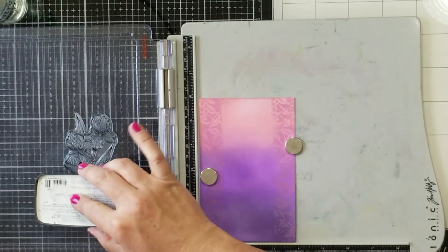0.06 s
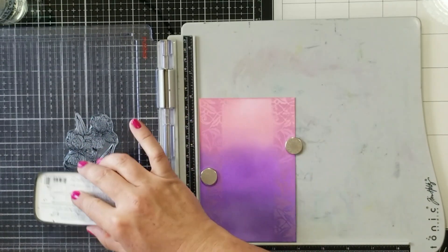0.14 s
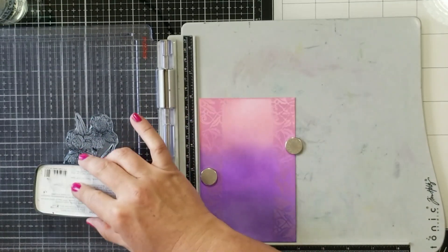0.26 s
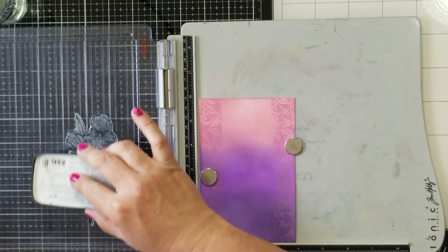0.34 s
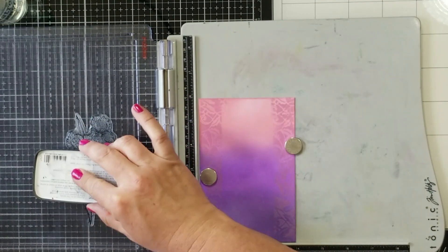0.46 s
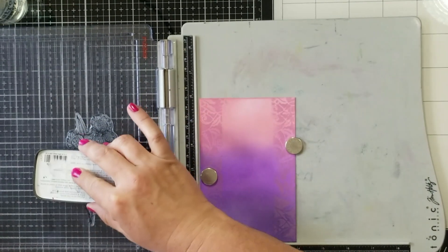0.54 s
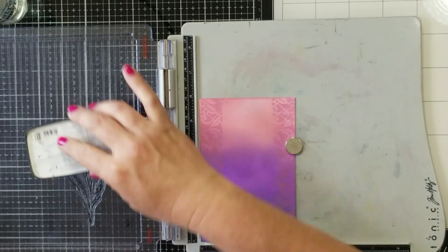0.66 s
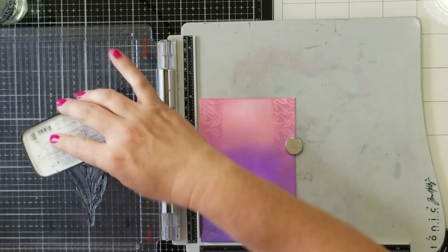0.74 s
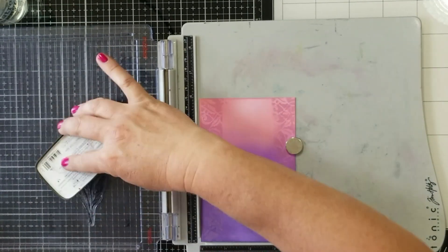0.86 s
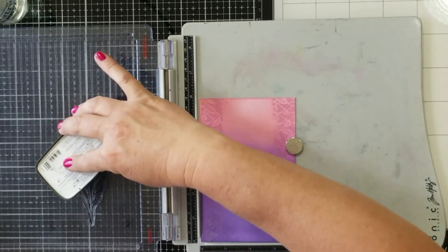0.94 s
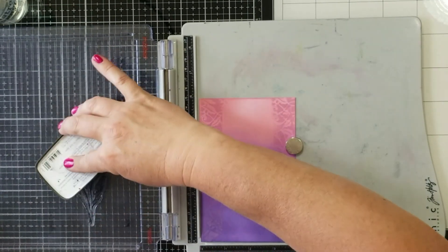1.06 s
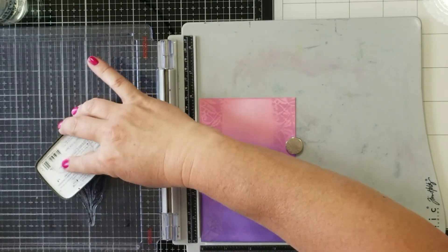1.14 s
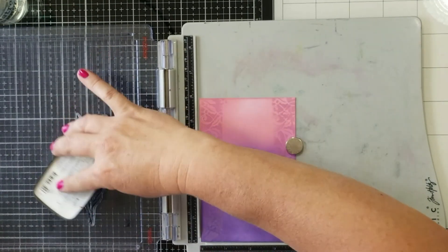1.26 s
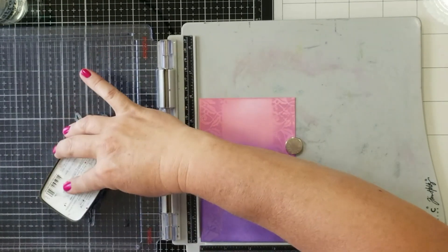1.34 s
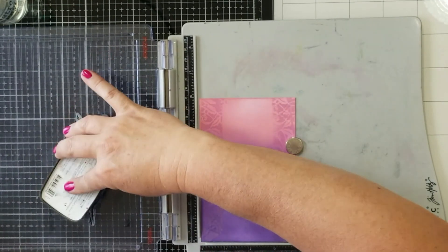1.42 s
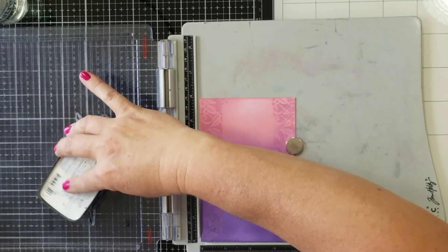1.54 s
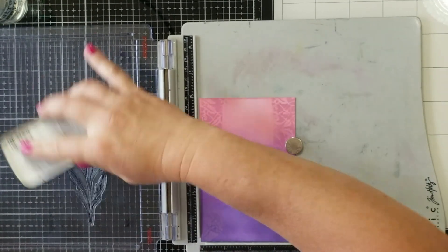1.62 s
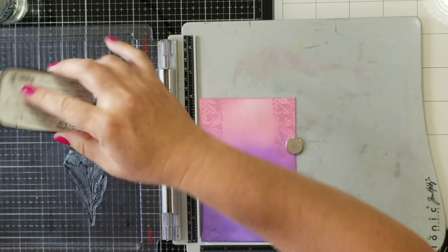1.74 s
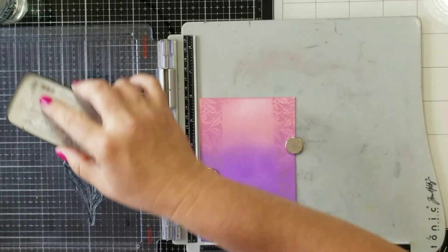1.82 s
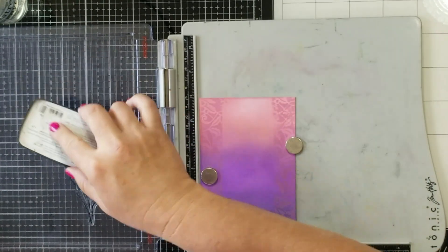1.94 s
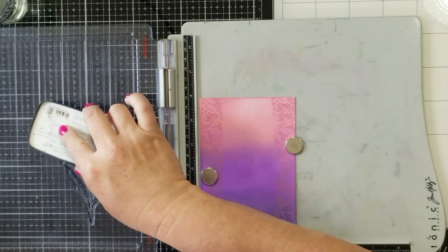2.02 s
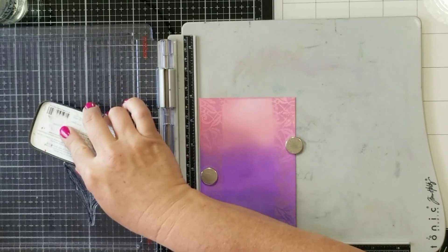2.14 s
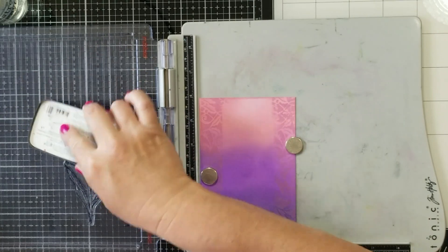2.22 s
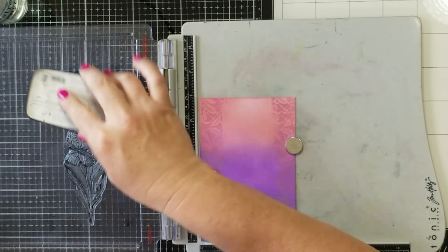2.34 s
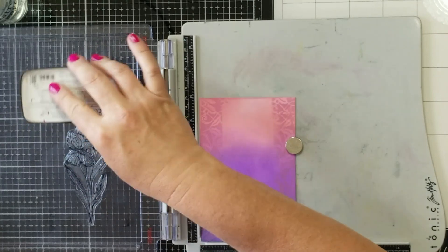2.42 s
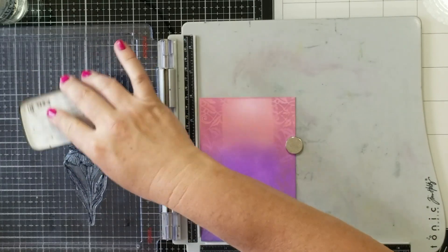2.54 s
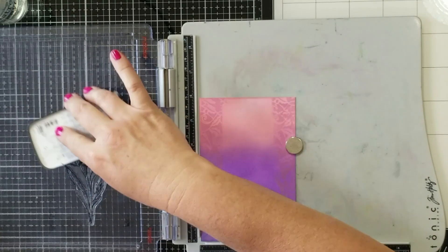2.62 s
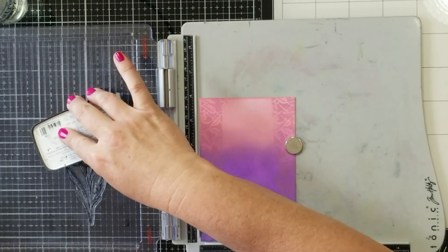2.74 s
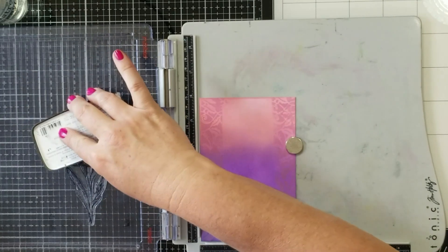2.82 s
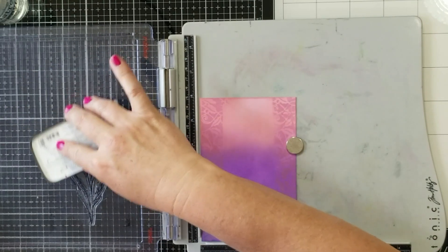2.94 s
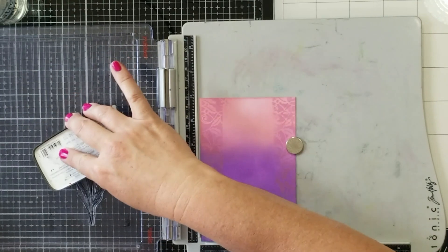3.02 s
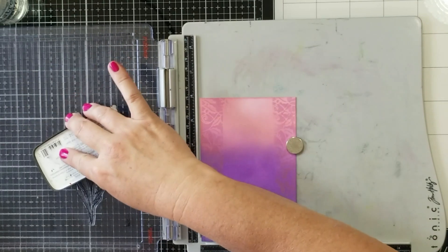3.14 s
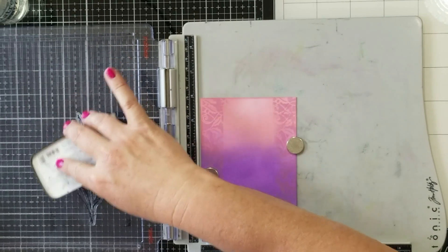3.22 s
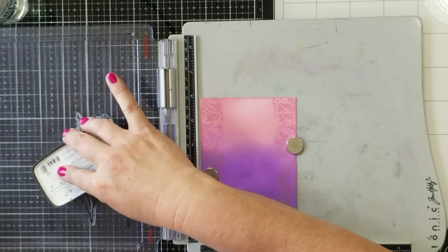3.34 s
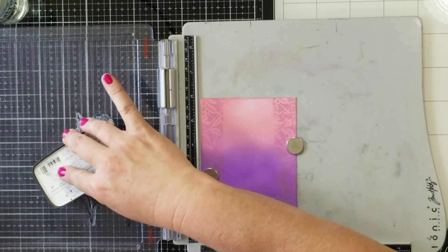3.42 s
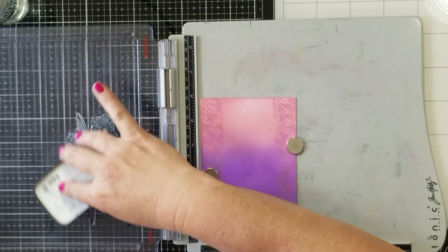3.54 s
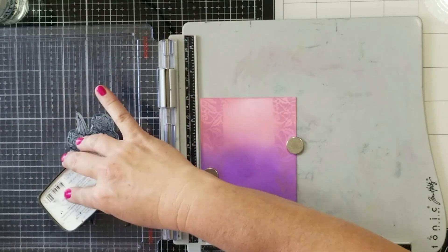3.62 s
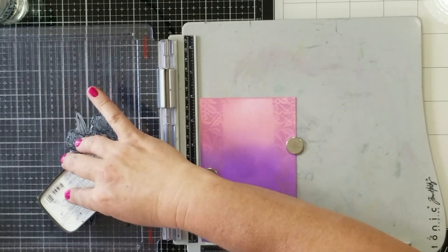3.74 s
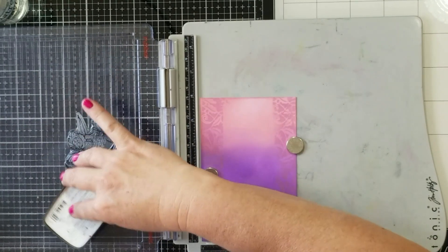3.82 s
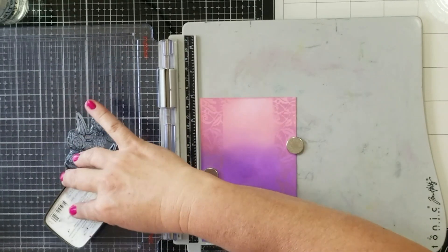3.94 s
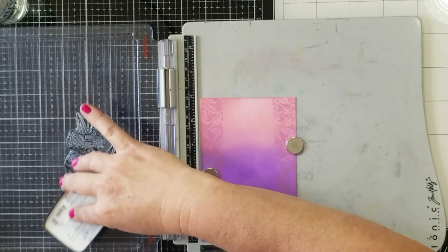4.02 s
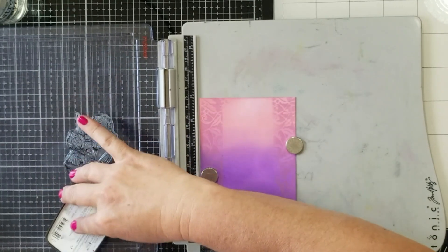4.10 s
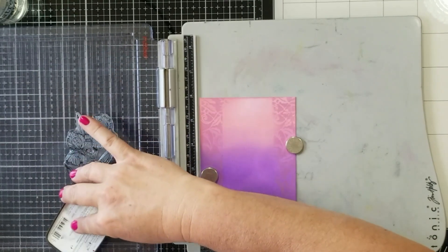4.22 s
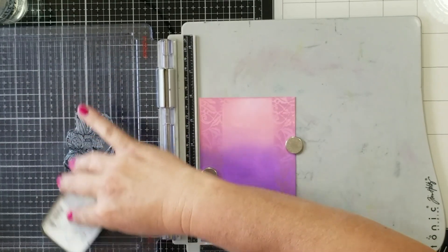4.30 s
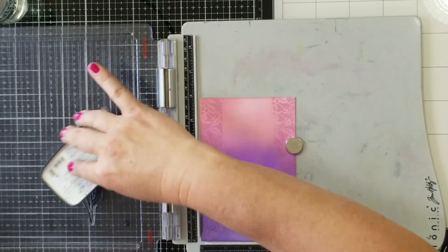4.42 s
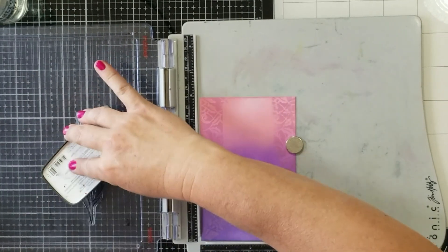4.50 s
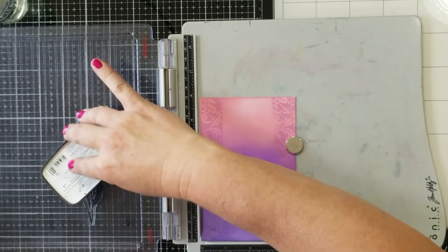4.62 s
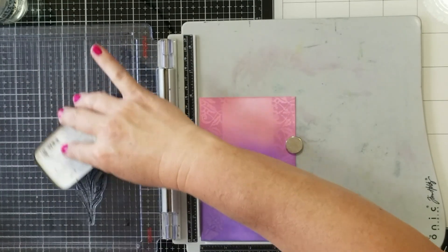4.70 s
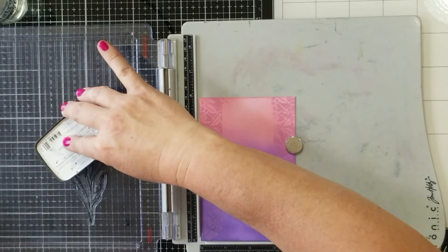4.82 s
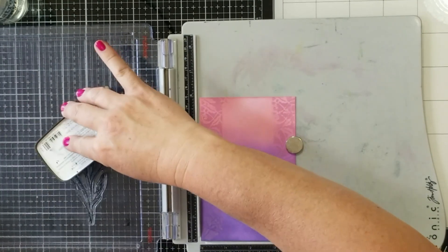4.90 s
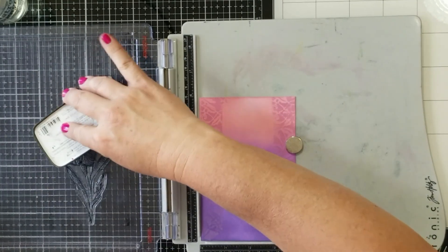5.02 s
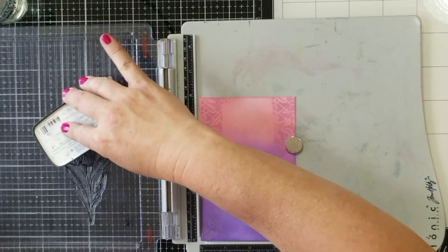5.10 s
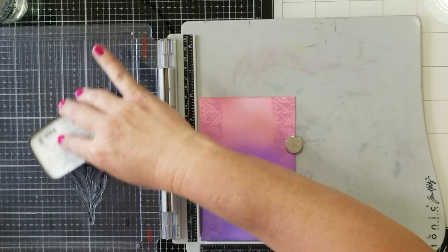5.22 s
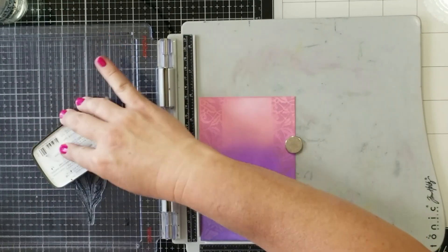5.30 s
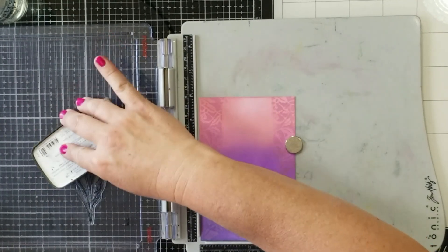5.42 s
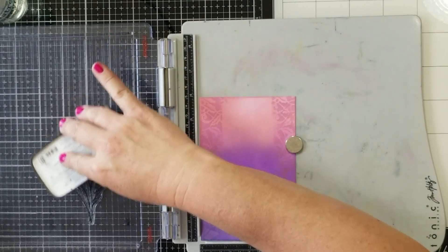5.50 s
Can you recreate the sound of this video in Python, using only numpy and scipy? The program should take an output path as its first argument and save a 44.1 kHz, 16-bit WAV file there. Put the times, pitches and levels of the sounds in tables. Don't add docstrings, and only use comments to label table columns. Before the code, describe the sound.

Irregular dabs of a pad on a plastic board: a firm one near the start, sparser and softer ones around one to two seconds, then closer, stronger ones after two and a half, loudest near five. Low table rumble swells under the pressing hand, and tiny crisp snaps mark the pad lifting. Small quiet room with short decay, close stereo pickup, soft air hum and hiss.

```python
import sys
import numpy as np
from scipy import signal
from scipy.fft import rfft, irfft
from scipy.io import wavfile

SR = 44100
rng = np.random.default_rng(int(sys.argv[2]) if len(sys.argv) > 2 else 0)


def volts_from_db(level):
    exponent = np.asarray(level, float) / 20
    return 10 ** exponent


def output_pcm(signal):
    pcm = np.clip(np.atleast_2d(signal).T, -1, 1) * 32767
    wavfile.write(sys.argv[1], SR, np.round(pcm).astype(np.int16))


N = 245195


def at_hz(points, hz, column=1):
    return np.interp(np.log(hz), np.log(np.array(points)[:, 0]), np.array(points)[:, column])


def rms_one(x):
    return x / np.sqrt(np.mean(x ** 2) + 1e-20)


def bandpass(x, order, low_hz, high_hz):
    return signal.sosfilt(signal.butter(order, [low_hz, high_hz], "band", fs=SR, output="sos"), x)


def ring(force, hz, t60):
    radius = volts_from_db(-60 / (max(t60, .01) * SR))
    angle = 2 * np.pi * hz / SR
    return signal.lfilter([0, np.sin(angle)], [1, -2 * radius * np.cos(angle), radius * radius], force + 1e-18)


def pair(mid, side, alike):
    alike = np.clip(alike, 0, 1)
    opposed = np.sqrt(1 - alike) * side * np.array([[1], [-1]])
    return (np.sqrt(1 + alike) * mid + opposed) / np.sqrt(2)


def lay(times, shapes):
    size = shapes.shape[-1]
    out = np.zeros(shapes.shape[1:-1] + (N + size,))
    for s, shape in zip(times, shapes):
        start = round(s * SR)
        out[..., start:start + size] += shape
    return out[..., :N]


def flicker(rate_hz, count):
    knots = rng.standard_normal((count, 2000))
    return np.array([np.interp(np.arange(N) / SR * rate_hz, np.arange(2000), k) for k in knots])


def humps(events, rest_db, on_db_per_s, off_db_per_s):
    s, level_db = np.transpose(events)[:, :, None]
    t = np.arange(0, N + 64, 64) / SR - s
    slope_db = np.minimum(on_db_per_s * t, -off_db_per_s * t)
    power = volts_from_db(2 * (level_db + slope_db)).sum(axis=0) + volts_from_db(2 * rest_db)
    return np.interp(np.arange(N) / 64, np.arange(len(power)), np.sqrt(power))


def coloured(spectrum, likeness):
    hz = np.maximum(np.arange(N // 2 + 1) * SR / N, 1)
    mid, side = rfft(rng.standard_normal((2, N))) * volts_from_db(at_hz(spectrum, hz))
    return rms_one(irfft(pair(mid, side, at_hz(likeness, hz)), N))


# frequency_hz, density_db (per Hz)
HISS = [(6000, -29.5), (7800, -13.5), (8300, -18), (9800, -18), (10300, -14), (12500, -5), (14500, -5),
        (15500, 2), (15750, -6), (15900, -48)]
HISS_DB = -77


def hiss():
    return volts_from_db(HISS_DB + 3.0) * coloured([(17, -44)] + HISS, [(20, .02), (16000, 0.028)])


# frequency_hz, density_db (per Hz)
AIR = [(15, -15), (25, -6.5), (128, 0.5), (192, -9.5), (341, -11), (403, -19.5), (434, -14), (1080, -18.5),
       (1370, -12), (1830, -20.5), (7700, -28), (10000, -46), (16900, -120)]
# frequency_hz, left_right_likeness (0 to 1)
AIR_LIKENESS = [(60, 0.67), (240, 0.39), (950, 0.0075), (3770, 0.065), (15000, 0.019)]
# frequency_hz, width_hz, level_db (over the air)
FAN_RESONANCES = [(771, 91, -1), (1540, 350, -4.5)]
AIR_DB = -69.5


def air():
    out = coloured(AIR, AIR_LIKENESS)
    for hz, width_hz, hump_db in FAN_RESONANCES:
        hump = rms_one(ring(rng.standard_normal(N), hz, 2.2 / width_hz))
        out = out + volts_from_db(hump_db - 10.5) * hump * volts_from_db(np.array([[0], [-9.0]]))
    return volts_from_db(AIR_DB) * out


# frequency_hz, level_db, t60_s, sign, rocks (1 if it rocks)
TABLE = [(45, -14, .17, 1, 0), (58.7, 0, .345, -1, 0), (65.7, -12, .5, 1, 0), (74.6, -7.6, .49, 1, 0),
         (93, -7, .45, 1, 1)]
# peak_s, level_db
LEANS = [
    (0.0, -56),
    (.31, -45),
    (2.15, -49.5),
    (2.93, -62),
    (3.76, -63.5),
    (4.47, -64),
    (4.99, -59),
    (5.4, -50),
]


def rumble():
    stir = rng.standard_normal(N)
    hum = sum(volts_from_db(mode_db) * ring(stir, hz, t60) for hz, mode_db, t60, _, _ in TABLE)
    return rms_one(hum) * volts_from_db(-6.0) * humps(LEANS, rest_db=-77.5, on_db_per_s=88, off_db_per_s=91)


# peak_s, level_db
PEELS = [(.12, -71), (.96, -79), (1.172, -72), (1.58, -77), (2.07, -75), (2.26, -68.5), (2.88, -73),
         (3.22, -71), (3.54, -66.5), (4.06, -81), (4.32, -71), (4.99, -71), (5.34, -72), (5.5, -72)]


def peel():
    snaps = rng.standard_normal((2, N)) * volts_from_db(4.2 * flicker(150., count=1))
    bright = bandpass(snaps, 3, 10300., 15300.)
    smear = bandpass(snaps, 2, 3500., 10000.)
    film = rms_one(bright) + volts_from_db(-6.5) * rms_one(smear)
    return film * volts_from_db(-5.0) * humps(PEELS, rest_db=-82, on_db_per_s=200, off_db_per_s=85)


# start_s, peak_db
TICKS = [(1.0505, -70), (1.1633, -64), (1.5773, -66), (2.2508, -64), (2.89, -68), (3.1976, -67),
         (3.486, -68), (3.5294, -54), (3.5325, -61), (3.537, -62), (4.2966, -67), (4.6748, -65),
         (4.9556, -66)]


def ticks():
    s, peak_db = np.transpose(TICKS)
    t = np.arange(2600) / SR
    shape = np.exp(-t / .0008) + .12 * np.exp(-t / .012)
    bursts = shape * rng.standard_normal((len(s), 2, 2600))
    snaps = lay(s, bursts * volts_from_db(peak_db + 4)[:, None, None])
    body = bandpass(snaps, 2, 4000, 7500)
    top = bandpass(snaps, 2, 10300, 14500)
    return .7 * body + 1.5 * top


def swell(spread_ms, edge, size=2600):
    u = np.arange(size) / SR * 1000 / np.clip(spread_ms, .2, 20)[:, None]
    shape = (u + max(edge, 0) * np.exp(-2 * u)) * np.exp(-u)
    return shape / np.sqrt(np.sum(shape ** 2, axis=1, keepdims=True))


# frequency_hz, left_right_likeness (0 to 1)
DAB_LIKENESS = [(60, .99), (130, 0.99), (290, 0.84), (850, 0.71), (1500, 0.11), (3000, 0.026)]
SPAN = 2 ** 14


def struck(times, level_db, spread_ms, modes, edge, scatter_db, tilt_db=0):
    rough = rng.standard_normal((len(times), 2, 2600))
    force = rfft(swell(spread_ms, edge)[:, None] * rough, SPAN)
    alike = at_hz(DAB_LIKENESS, np.maximum(np.arange(SPAN // 2 + 1) * SR / SPAN, 1))
    force = np.array([pair(mid, side, alike) for mid, side in force])
    hz, mode_db, t60 = np.transpose(modes)
    t = np.arange(SPAN) / SR
    decay = volts_from_db(-60 * t / np.clip(t60, .04, .26)[:, None])
    rings = rfft(np.sin(2 * np.pi * hz[:, None] * t) * decay)
    at_modes = force[..., np.round(hz * SPAN / SR).astype(int)]
    drive = np.sqrt(np.mean(np.abs(at_modes) ** 2, axis=1))
    mode_db = mode_db + np.outer(tilt_db, np.log2(hz / np.median(hz)))
    scatter = scatter_db * rng.standard_normal(drive.shape)
    gain = volts_from_db(level_db[:, None] + mode_db + scatter) / (drive + 0.67)
    return lay(times, irfft(force * (gain @ rings)[:, None], SPAN))


# start_s, table_db, rocking_share_db, board_thud_db, board_knock_db
PRESSES = [(0.079, -36, 4.5, -45, -59), (0.23, -37.5, 4, -45.5, -44.5), (0.904, -42, -9, -46, -43),
           (1.332, -46, 3.5, -47, -66), (2.084, -40, -26, -45.5, -52.5), (2.699, -39.5, -3, -43, -44.5),
           (3.012, -48.5, -2, -51, -60), (3.314, -40, 2.5, -49, -49), (3.601, -37, 6.5, -40.5, -48),
           (3.871, -40.5, 5, -51.5, -56), (4.132, -45.5, 0, -66.5, -68), (4.486, -35, -0.5, -42.5, -48.5),
           (4.784, -30, -18, -37.5, -39), (5.055, -33, 2, -42, -50), (5.315, -32, -0.5, -43, -38.5),
           (5.545, -71, -2, -56, -60.5)]
# start_s, table_db, board_thud_db
NUDGES = [
    (0.008, -70, -70),
    (0.398, -49.5, -60),
    (0.438, -49.5, -61),
    (2.199, -55.5, -69),
    (4.287, -59.5, -84),
    (4.627, -57.5, -78),
    (4.683, -55, -80),
    (4.985, -60, -81),
]
NUDGE_ROCK_DB, NUDGE_KNOCK_DB = 1.5, -8


def presses():
    nudges = [(s, db, NUDGE_ROCK_DB, thud_db, thud_db + NUDGE_KNOCK_DB) for s, db, thud_db in NUDGES]
    return np.transpose(sorted([tuple(row) for row in PRESSES] + nudges))


def table():
    s, table_db, rock_db, _, _ = presses()
    u = np.arange(1500) / SR / .002
    push = (u * np.exp(-u) / np.sum(u * np.exp(-u)))[None]
    out = 0
    for hz, mode_db, t60, sign, rocks in TABLE:
        level_db = table_db + mode_db + rocks * rock_db + 5.0
        out = out + sign * ring(lay(s, push * volts_from_db(level_db)[:, None]), hz, t60)
    return out


# frequency_hz, level_db, t60_s
BOARD_THUD = [(132, -9, 0.49), (152, -20, 0.3), (165.8, -5, 0.3), (177.4, -3, 0.22), (189.8, 1.5, 0.213),
              (203, -21.5, 0.27)]
# frequency_hz, level_db, t60_s
BOARD_KNOCK = [(245.5, -11, 0.4), (275.7, -1, 0.25), (308.1, -3.5, 0.48), (348.9, 3, 0.17),
               (374, -23, 0.34)]


def board():
    s, _, _, thud_db, knock_db = presses()
    spread_ms = np.full(len(s), 12.6)
    thud = struck(s + 0.00595, thud_db + 5.5, spread_ms, BOARD_THUD, edge=0.024, scatter_db=1.5)
    knock = struck(s + 0.00188, knock_db + 1.0, 1.27 * spread_ms, BOARD_KNOCK, edge=0.025, scatter_db=0.5)
    return thud + knock


# start_s, lid_ring_db, lid_knock_db, case_ring_db, clack_db
DABS = [(.072, -55, -64, -59, -78), (0.2243, -40.5, -44.5, -47, -64.5), (.245, -53, -50.5, -70, -74),
        (0.8974, -45, -43.5, -48.5, -56), (1.328, -58, -62.5, -76, -80), (2.084, -40, -50.5, -55.5, -63.5),
        (2.699, -36, -48, -61.5, -72.5), (3.012, -71, -63.5, -78, -81), (3.311, -49, -58.5, -68, -74.5),
        (3.601, -38.5, -58, -53, -63.5), (3.617, -43, -50, -58, -77), (3.870, -44, -62, -64, -75),
        (4.128, -57.5, -78, -70, -91), (4.491, -44.5, -59, -63, -66.5), (4.672, -68, -80, -77, -74),
        (4.785, -36.5, -40.5, -45, -63), (5.058, -35.5, -44.5, -51.5, -76), (5.316, -49, -43.5, -63, -96),
        (5.545, -60, -57, -71, -78)]
# start_s, knock_db
GRAZES = [
    (2.077, -55),
    (2.687, -51),
    (3.596, -57),
    (4.473, -52),
    (4.776, -44),
    (5.049, -50.5),
    (5.308, -47),
]
GRAZE_LID_DB, GRAZE_CASE_DB, GRAZE_CLACK_DB = -2.5, -14, -23
SQUARE_MS, ROLLED_MS, GRAZE_MS = 3.1, 4.45, 4.8


def touches():
    rolled = [any(0 < dab[0] - s < .02 for s, _ in GRAZES) for dab in DABS]
    rows = [(*dab, ROLLED_MS if roll else SQUARE_MS) for dab, roll in zip(DABS, rolled)]
    for s, db in GRAZES:
        rows.append((s, db + GRAZE_LID_DB, db, db + GRAZE_CASE_DB, db + GRAZE_CLACK_DB, GRAZE_MS))
    return np.transpose(sorted(rows))


# frequency_hz, level_db, t60_s
ECHO = [(1215, -6.5, 0.29), (1685, -7.5, 0.25), (2890, -4.5, 0.28), (4090, -3, 0.26), (4780, -1.5, 0.24),
        (7030, -2.5, 0.25)]


def clack():
    s, _, _, case_db, clack_db, spread_ms = touches()
    white, out = rng.standard_normal((2, 2, N)), 0
    lumps = flicker(110., count=len(ECHO))
    rise = swell(1.4 * spread_ms, edge=0.52) ** 2
    t = np.arange(rise.shape[1]) / SR
    edge = volts_from_db(2 * 13.5) / spread_ms[:, None] ** 2 * np.exp(-t / .002)
    for k, (hz, band_db, t60) in enumerate(ECHO):
        bright = np.clip(np.log2(hz / 2200.0), 0, 1)
        power = volts_from_db(2 * (band_db + bright * clack_db + (1 - bright) * case_db))[:, None]
        tail = signal.lfilter([1], [1, -volts_from_db(-120 / (t60 * SR))], lay(s, rise * power))
        tail = tail * volts_from_db(2 * 3.5 * lumps[k])
        band = bandpass(white[k % 2], 2, hz / 1.23, hz * 1.177)
        out = out + rms_one(band) * np.sqrt(tail + lay(s, edge * power))
    return out


# start_s, level_db
STEM_DABS = [
    (3.6, -48),
    (3.617, -47),
    (3.870, -51),
    (4.128, -62),
]
# frequency_hz, level_db, t60_s
STEM_MODES = [(1057, 1, 0.12), (1193, -1, 0.14), (1295, -1, .1), (2490, -9, 0.12)]


def stem():
    s, level_db = np.transpose(STEM_DABS)
    return struck(s, level_db, np.full(len(s), 4.0), STEM_MODES, edge=1.0, scatter_db=2.5)


# frequency_hz, level_db, t60_s
LID = [(757, -8.5, 0.21), (783.7, 1.5, 0.15), (835, -0.5, 0.15), (854, -11, 0.36), (885, -15.5, 0.16),
       (967, -21, 0.13), (999, -17, 0.38), (1070, -40, 0.37), (1190, -22, 0.13)]
# frequency_hz, level_db, t60_s
LID_KNOCK = [(415.6, -8.5, 0.2), (478, -9.5, 0.25), (527, -2.5, 0.19), (584, -18.5, 0.4), (650, -0.5, 0.17),
             (689, -3.5, 0.13)]
# frequency_hz, level_db, t60_s
CASE = [(1310, -21, 0.14), (1580, -14, 0.051), (1797, 3, 0.051), (1804, 6, 0.048), (2020, -13, 0.041),
        (2305, -0.5, 0.064), (2700, -14, 0.094), (2734, -1.5, 0.038), (2970, -3, 0.089)]


def lid_and_case():
    s, lid_db, knock_db, case_db, clack_db, spread_ms = touches()
    tilt_db = np.clip(1.6 * (clack_db - case_db + 12), -12, 12)
    lid = struck(s, lid_db - 2.0, 1.45 * spread_ms, LID, edge=0.99, scatter_db=0.5)
    knock = struck(s, knock_db + 0.5, 2.02 * spread_ms, LID_KNOCK, edge=0.42, scatter_db=2.5)
    case = struck(s, case_db - 4.5, 1.95 * spread_ms, CASE, edge=1.7, scatter_db=4.0, tilt_db=tilt_db)
    return lid + knock + case


DAB_LEAN_DB = -0.84
SOUND_CUT_HZ = 7700


def scene():
    lean = volts_from_db(DAB_LEAN_DB / 2 * np.array([[1], [-1]]))
    far = lean * (board() + lid_and_case() + clack()) + air()
    far = signal.sosfilt(signal.cheby2(8, 40, SOUND_CUT_HZ * 1.09, fs=SR, output="sos"), far)
    return lean * table() + rumble() + far + ticks() + peel() + lean * stem()


# frequency_hz, left_minus_right_db
PORT_LEAN = [(60, 2.1), (200, 3.5), (600, 4.5), (1300, 5), (4400, 5.5), (8000, 2), (13000, 3.5)]


def ports(x):
    lean = at_hz(PORT_LEAN, np.maximum(np.arange(N // 2 + 1) * SR / N, 1)) / 2
    return irfft(rfft(x) * volts_from_db(np.array([lean, -lean])), N)


def band_limit(x):
    return signal.sosfilt(signal.butter(12, 15760, fs=SR, output="sos"), x)


def record(dry):
    x = dry + hiss()
    x = signal.sosfilt(signal.butter(2, 30., "high", fs=SR, output="sos"), x)
    return band_limit(ports(x))


dry = scene()
out = record(dry)
output_pcm(out)
```